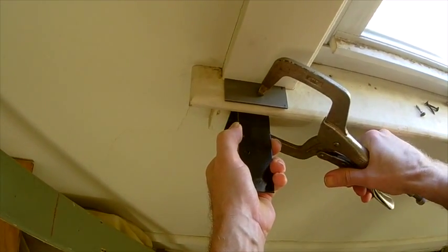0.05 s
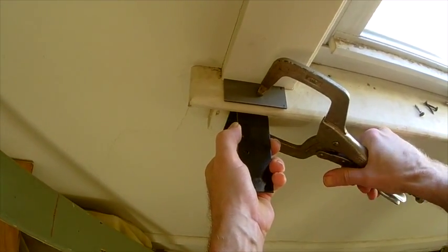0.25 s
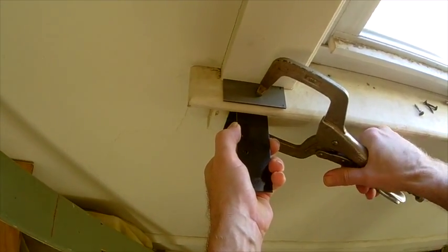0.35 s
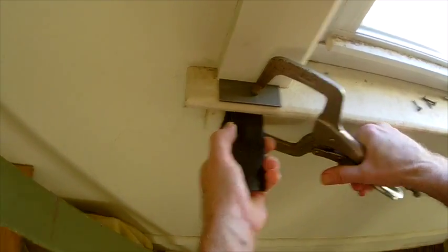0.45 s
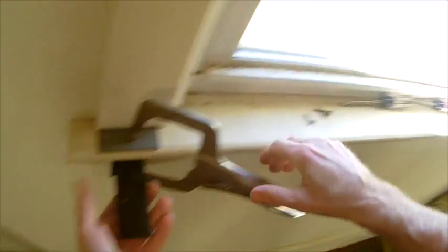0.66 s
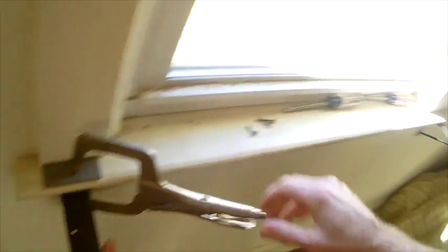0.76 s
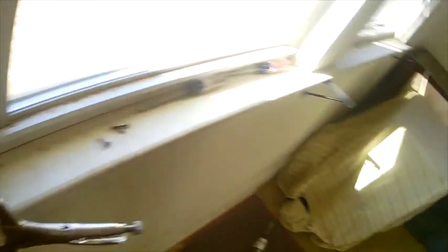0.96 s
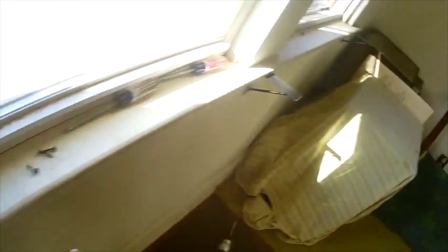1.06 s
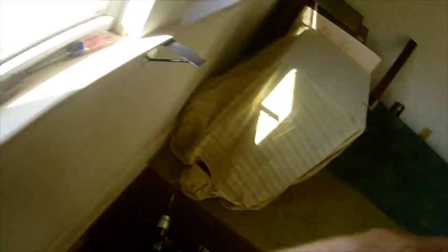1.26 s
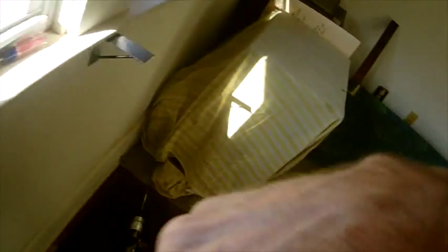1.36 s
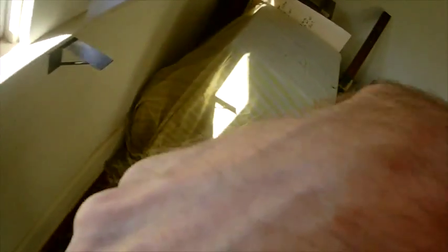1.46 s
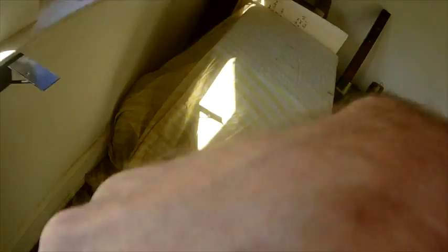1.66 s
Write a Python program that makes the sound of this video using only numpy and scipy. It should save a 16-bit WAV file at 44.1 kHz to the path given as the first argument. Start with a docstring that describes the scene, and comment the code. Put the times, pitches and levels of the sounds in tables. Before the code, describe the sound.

Locking pliers clamp onto a steel bracket against a wooden sill. After quiet room tone, a faint tick at 0.23 seconds leads straight into a loud, hard metallic snap at 0.25, slightly distorted, with a rebound click at 0.30. A bright midrange ring and woody room tail fade by about 0.9. Faint ticks and rustles follow, with a soft low footfall near 1.3 and small handling ticks around 1.5.

```python
"""Small furnished room: locking pliers snap shut on a steel bracket held to a wooden sill.
A lead-in tick, the snap (two blows 2 ms apart) and a rebound: noise cracks, decaying sines for metal, room
and sill, and a diffuse noise tail for the room; the snap overloads the input.
Later, faint ticks (sine and noise), soft puffs of grainy noise (brief noisy ticks and a rustle) and a footfall
(low floor modes). Beneath: room tone and a band near 1 kHz (coloured noise), and a faint wavering sine."""
import sys
import numpy as np
from scipy import signal
from scipy.fft import rfft, irfft
from scipy.io import wavfile
from scipy.ndimage import map_coordinates

SR = 44100
rng = np.random.default_rng(int(sys.argv[2]) if len(sys.argv) > 2 else 0)


def invert_db(x):
    """Field ratio 10**(x/20) for x, a level in decibels (scalar or array-like)."""
    u = np.asarray(x, float) / 20
    return 10 ** u


def to_wav(s):
    """Save 16-bit WAV."""
    ch = np.atleast_2d(s).T  # columns
    pcm = np.round(np.clip(ch, -1, 1) * 32767)  # PCM
    wavfile.write(sys.argv[1], SR, pcm.astype(np.int16))


N = 74970
T = np.arange(N) / SR  # s

# Room tone and microphone hiss. Each row: frequency in Hz, relative density in dB per Hz.
TONE_SPECTRUM = [(4.7, -29.5), (8.0, 1.5), (96, -3.5), (123, -6.5), (240, -9), (310, -10.5), (341, -8.5),
                 (831, -14.5), (914, -13.5), (1670, -23), (1840, -24.5), (16000, -42.5)]
# Level over time of the noise band near 1 kHz. Each row: time in seconds, level in dB.
BAND_LEVEL = [(0, -61), (.08, -60), (.22, -65.5), (.7, -64.5), (.85, -76), (1.0, -70.5), (1.2, -74),
              (1.45, -72), (1.7, -62)]
# Colour of the noise band near 1 kHz. Each row: frequency in Hz, relative density in dB per Hz.
BAND_SPECTRUM = [(600, -34), (820, 1), (1000, 0), (1250, 1), (1500, -31.5)]
# Floor modes under the footfall. Each row: frequency in Hz, level before the rise in dB, t60 in seconds.
FLOOR_MODES = [(15.6, -39, .9), (45, -38, .2)]
# Soft noise puffs: brief noisy ticks and a rustle. Each row: centre in seconds, half length in seconds,
# level in dB.
NOISE_PUFFS = [(.668, .02, -71), (.935, .025, -72), (1.225, .008, -71), (1.275, .015, -71),
               (1.513, .006, -63), (1.61, .014, -63)]
# Puff colour before graining. Each row: frequency in Hz, relative density in dB per Hz.
PUFF_SPECTRUM = [(400, -60), (900, 6), (2500, 0), (4500, -6), (7000, -60)]
# Faint ticks. Each row: start in seconds, level of the sine in dB, frequency in Hz, t60 in seconds.
FAINT_TICKS = [(.726, -52, 700, .02), (1.472, -57, 420, .06), (1.511, -53, 2120, .045)]
# Colour of the room's answer. Each row: frequency in Hz, relative density in dB per Hz.
ECHO_SPECTRUM = [(60, -48.5), (156, -41.5), (308, -21.5), (408, -27.5), (540, -19), (640, -25),
                 (760, -19.5), (1000, -12), (1190, -7.5), (1420, -16.5), (2000, -16.5), (2350, -16),
                 (3120, -22.5), (3900, -18.5), (4450, -16), (4850, -27.5), (5200, -25.5), (6280, -42.5),
                 (7600, -44), (8300, -36), (9000, -45), (16000, -51.5)]
# Room decay. Each row: frequency in Hz, t60 in seconds.
ROOM_DECAY = [(100, 0.68), (260, 0.71), (700, 0.52), (1840, 0.53), (4850, 0.45), (12800, 0.28)]
# Blows of the pliers. Each row: start in seconds, relative level in dB, share that rings on (linear),
# crack t60 in seconds.
PLIER_BLOWS = [(0.2345, -27, 0.18, .018), (0.2462, -3.5, 1, .05), (0.2482, -8, 0.061, .06),
               (.3038, -10, 0.01406, .006)]
# Crack colour. Each row: frequency in Hz, relative density in dB per Hz.
CRACK_SPECTRUM = [(35, -50.5), (170, -29), (300, -17.5), (520, -13), (650, -22.5), (1090, 2.5), (1400, -17),
                  (2400, 1.5), (3120, -17.5), (4200, -7.5), (6300, -27), (9000, -22.5), (16000, -33.5)]
# Ringing lines of the snap, metal and room together. Each row: frequency in Hz, relative level in dB,
# t60 in seconds.
SNAP_LINES = [(911, -11, 0.514), (1001.4, -9.5, 0.78), (1012, -14, 0.38), (1026, -11, .5), (1103, -13, .55),
              (1142, -2, 0.59), (1157, 6.5, 0.37), (1198.6, -2, .65), (1286, -11.5, 0.37),
              (1309.6, -10, 0.58), (1987, -7.5, 0.45), (2068, -9, .3), (2238, -11.5, .3),
              (2324, -24.5, 0.94), (2415, -8, 0.38), (2508, -15.5, 0.13), (2750, -5, 0.14),
              (2837, -17.5, .35), (3410, -14.5, 0.63), (3694, -9.5, 0.29), (3757, -21.5, 0.67),
              (4086, -21.5, 0.67), (4090, -29, 0.58), (4360, -18, 0.394), (4340, -18, 0.55),
              (5020, -24.5, .35), (5094, -20, 0.51), (5770, -31, 0.51), (7980, -31, .25),
              (8420, -32.5, 0.21)]
# Wooden sill modes. Each row: frequency in Hz, relative level in dB, t60 in seconds.
SILL_MODES = [(42.1, -12, .4), (208.7, -15.5, .3), (301.6, -3.5, 0.65), (322.4, 2, .45), (479.3, 4.5, 0.2),
              (556.3, -4.5, .4), (769, -6, .45)]

CRACK_RISE_S = .0006  # also the rise of the faint ticks


def unit(x):
    """Scales x to rms 1."""
    return x / np.sqrt(np.mean(x ** 2) + 1e-20)


def along(points, hz):
    """Reads (Hz, value) points on a log frequency axis."""
    point_hz, value = np.transpose(points)
    return np.interp(np.log(hz + 1), np.log(point_hz + 1), value)


def wobble(knots_per_s):
    """Smooth random curve through Gaussian knots."""
    return map_coordinates(rng.standard_normal(N // 100), [T * knots_per_s])


def noise(spectrum):
    """Gaussian noise shaped by a spectrum, rms 1."""
    hz = np.fft.rfftfreq(N, 1 / SR)
    white = rfft(rng.standard_normal(N))
    return unit(irfft(white * invert_db(along(spectrum, hz)), N))


def after(start_s, rise_s, t60_s):
    """Time since start_s, and an envelope of exponential rise and decay."""
    t = np.maximum(T - start_s, 0)
    return t, (1 - np.exp(-t / rise_s)) * invert_db(-60 * t / t60_s)


def ring(lines, start_s, rise_s, waver_rad):
    """Sum of decaying sines; random phase waver grows with frequency, waver_rad applies at 1 kHz."""
    out = np.zeros(N)
    for hz, db, t60_s in lines:
        t, envelope = after(start_s, rise_s, t60_s)
        waver = waver_rad * (hz / 1000) ** .25 * wobble(25)
        out += invert_db(db) * envelope * np.sin(2 * np.pi * hz * t + waver)
    return out


def room_tone():
    """Steady coloured noise, its level drifting slowly."""
    return invert_db(-56.95 + .8 * wobble(3.2)) * noise(TONE_SPECTRUM)


def noise_band():
    """Band of noise near 1 kHz, rising and falling along a level curve with random flutter."""
    level_db = np.interp(T, *np.transpose(BAND_LEVEL)) + 1.5 * wobble(16)
    return invert_db(level_db) * noise(BAND_SPECTRUM)


def faint_tone():
    """Sine of wavering level that swells and fades."""
    hum_hz, hum_db, centre_s, half_s = 900, -65.5, 0.61, 0.48
    swell = np.exp(-((T - centre_s) / half_s) ** 4)
    return invert_db(hum_db + 1.8 * wobble(5.5)) * swell * np.sin(2 * np.pi * hum_hz * T)


def footfall():
    """Low floor modes with a slow rise and steady phase."""
    return ring(FLOOR_MODES, start_s=1.265, rise_s=.07, waver_rad=0)


def soft_puffs():
    """Bell-shaped puffs of band noise, grained by fast random level."""
    puffs = sum(invert_db(db) * np.exp(-((T - centre_s) / half_s) ** 2) for centre_s, half_s, db in NOISE_PUFFS)
    return puffs * unit(invert_db(2.2 * wobble(400)) * noise(PUFF_SPECTRUM))


def faint_ticks():
    """Short decaying sines, each with narrow noise around its pitch."""
    out = np.zeros(N)
    for start_s, db, hz, t60_s in FAINT_TICKS:
        t, envelope = after(start_s, CRACK_RISE_S, t60_s)
        rough = noise([(hz / 2, -70), (hz, 0), (hz * 2, -70)])
        out += invert_db(db) * envelope * (np.sin(2 * np.pi * hz * t) + 0.5 * rough)
    return out


def room(start_s):
    """Room's answer to a blow: 1 s of dense noise, each frequency decaying at its own rate."""
    rise_s = .006
    hz, t, bins = signal.stft(noise(ECHO_SPECTRUM)[:SR], SR, nperseg=256)
    decay = invert_db(-60 * t / along(ROOM_DECAY, hz)[:, None])
    tail = signal.istft(bins * decay, SR, nperseg=256)[1][:SR]
    out, at = np.zeros(N + SR), round(start_s * SR)
    out[at:at + SR] = tail * (1 - np.exp(-T[:SR] / rise_s))
    return out[:N]


def pliers():
    """Each blow makes a noise crack, ringing lines, sill modes and a diffuse room tail."""
    crack_db, lines_db, sill_db, echo_db = -6.5, -20.5, -30, -17  # gains within a blow
    rise_s, waver_rad = .003, 0.49
    out = np.zeros(N)
    for start_s, db, share, crack_t60_s in PLIER_BLOWS:
        crack = invert_db(crack_db) * after(start_s, CRACK_RISE_S, crack_t60_s)[1] * noise(CRACK_SPECTRUM)
        ringing = invert_db(lines_db) * ring(SNAP_LINES, start_s, rise_s, waver_rad)
        sill = invert_db(sill_db) * ring(SILL_MODES, start_s, rise_s, waver_rad)
        echo = invert_db(echo_db) * room(start_s)
        out += invert_db(db) * (crack + share * (ringing + sill + echo))
    return out


def scene():
    """Sums all sources into one channel."""
    background = room_tone() + noise_band() + faint_tone()
    movement = footfall() + soft_puffs() + faint_ticks()
    return (background + movement + pliers())[None]


def roll_off(x):
    """The treble ends steeply here."""
    return signal.sosfilt(signal.butter(12, 16500, fs=SR, output="sos"), x)


def record(dry):
    """The input saturates with a firm knee; a lowpass at 16.3 kHz follows."""
    clip_top, knee_power, top_hz = .252, 9, 16300
    clipped = dry / (1 + np.abs(dry / clip_top) ** knee_power) ** (1 / knee_power)
    limited = irfft(rfft(clipped) * (np.fft.rfftfreq(N, 1 / SR) < top_hz), N)
    return roll_off(limited)


dry = scene()
out = record(dry)
to_wav(out)
```